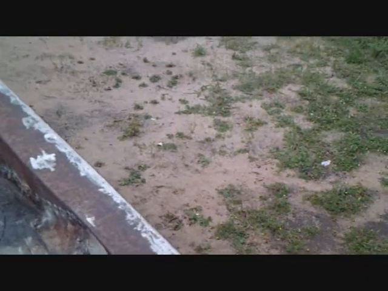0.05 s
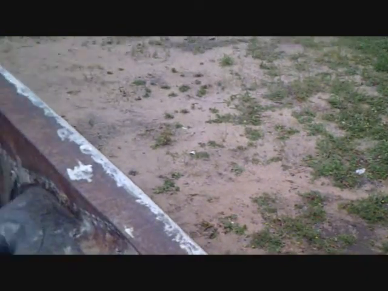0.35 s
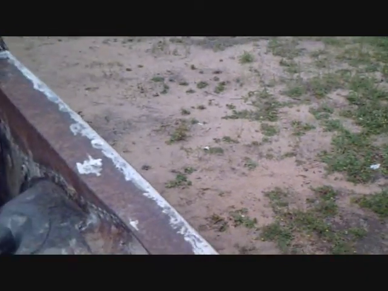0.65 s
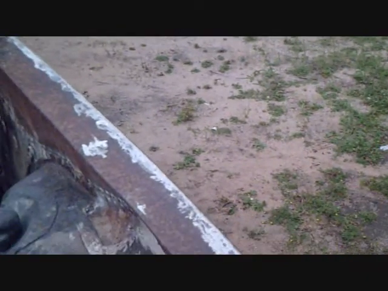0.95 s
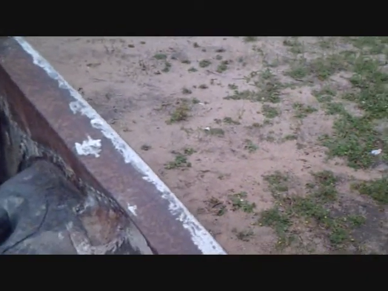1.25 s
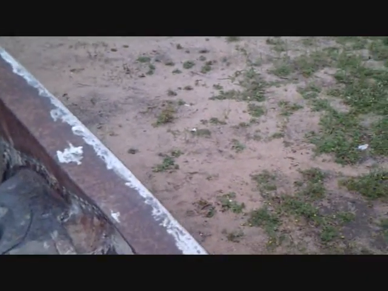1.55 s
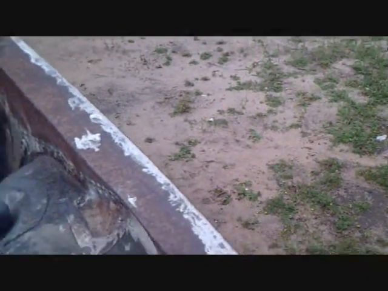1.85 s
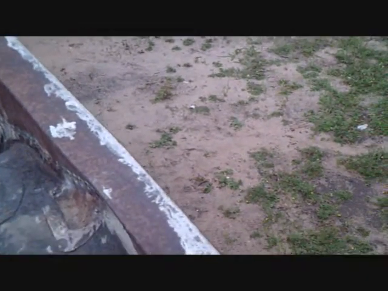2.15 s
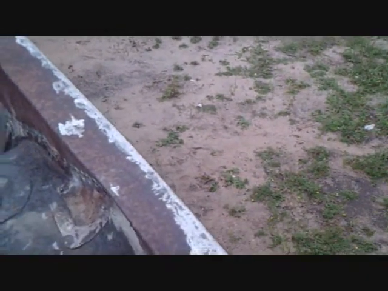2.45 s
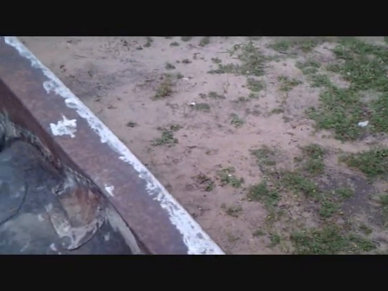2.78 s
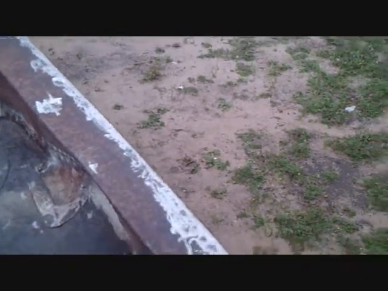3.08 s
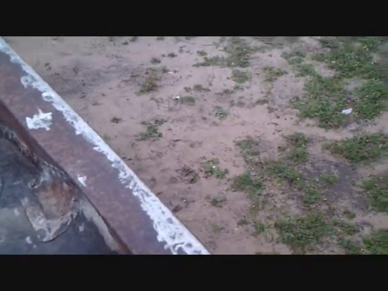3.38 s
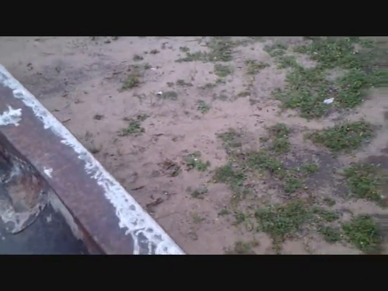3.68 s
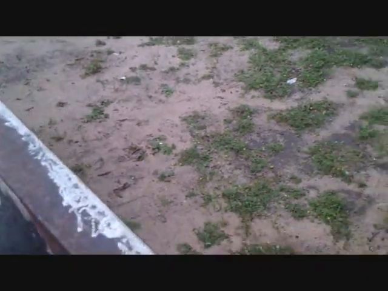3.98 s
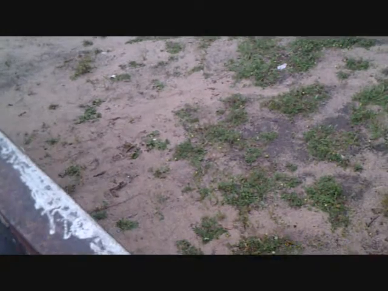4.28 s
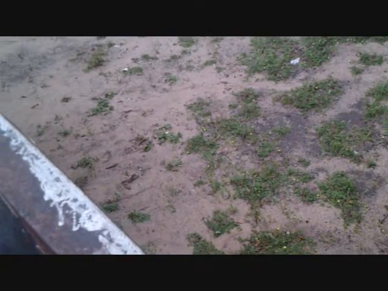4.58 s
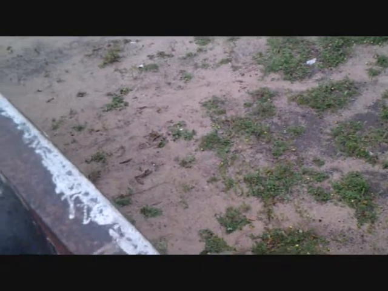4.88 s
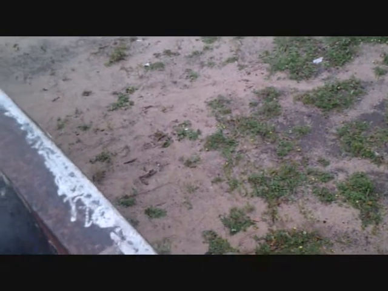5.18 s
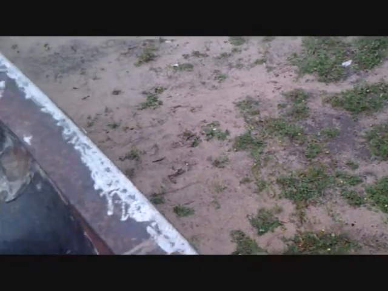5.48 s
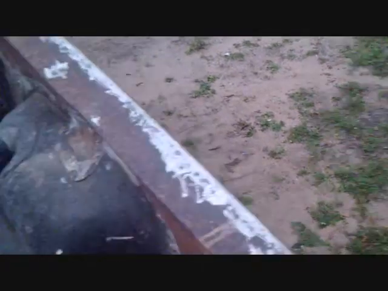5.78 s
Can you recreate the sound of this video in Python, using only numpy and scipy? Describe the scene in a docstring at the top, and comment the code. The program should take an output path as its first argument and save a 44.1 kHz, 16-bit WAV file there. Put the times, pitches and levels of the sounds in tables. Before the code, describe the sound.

A loose steel tailgate is moved about on a truck bed outdoors, close to the microphone, over soft air rumble, hiss and a faint high electronic whine. From the start, light, irregular knocks and gritty scrapes mix low thuds with short metallic ringing, growing firmer around 1.4 seconds. At about 1.7 seconds comes the loudest event, a harsh slam that overloads into a crunch; the whole sound dips, then slowly creeps back up. Strong clunks follow around 2.6 and 2.8 seconds and again at 3.1, trailing into lighter knocks until about 3.9. From 4 seconds the gate drags with a quieter, juddering scrape, and an edge gives a faint, brief squeal near 4.8. After a knock at 5 seconds, the gate drops into place with a solid clunk at about 5.3, followed by a few small settling taps until 5.6.

```python
"""A loose steel tailgate is moved about on a truck bed, outdoors, close to a small camera.
Over soft air noise and a faint whine, the gate scrapes and knocks; each clunk is a burst of tiny
bounces that rings the gate and the bed. At about 1.7 s a slam overloads the camera, which turns itself
down, whine and all, then creeps back up. More shoves and knocks follow, an edge squeals near 4.8 s,
and the gate drops into place at about 5.3 s."""
import sys
import numpy as np
from scipy import signal
from scipy.fft import rfft, irfft, next_fast_len
from scipy.io import wavfile

SR = 44100
rng = np.random.default_rng(int(sys.argv[2]) if len(sys.argv) > 2 else 0)


def int16_out(signal):
    """Quantize to a 16-bit WAV file."""
    q = np.round(np.clip(np.atleast_2d(signal).T, -1, 1) * 32767)
    wavfile.write(sys.argv[1], SR, q.astype(np.int16))


N = 257103
TIME = np.arange(N) / SR
THUD_TOP_HZ, TICK_BOTTOM_HZ = 350, 2300  # the clank lies between these two

# blows of the gate, plus one faint electrical click near 4.37 s;
# the slam is five quick bursts, a harsh overloaded crunch:
# t/s, contact time/s, thud level/dB, clank level/dB, tick level/dB
BLOWS = [(0.172, 0.0058, -40.5, -42, -58), (0.241, 0.039, -26, -29.5, -76),
         (0.2988, 0.017, -21, -25.5, -34), (0.33, 0.002, -24, -56, -30.5), (0.387, 0.0024, -29, -47, -49),
         (0.444, 0.0047, -37, -43, -57), (0.534, 0.013, -35, -43, -72), (0.752, 0.03, -29.5, -30.5, -40),
         (1.011, 0.014, -32, -38, -45.5), (1.029, 0.016, -26, -32, -44), (1.3603, 0.008, -15, -29, -83),
         (1.379, 0.012, -21, -38.5, -74.5), (1.436, 0.015, -32.5, -38, -90),
         (1.521, 0.032, -17.5, -21.5, -44), (1.597, 0.024, -45, -62, -46.5),
         (1.671, 0.0046, -17, -16, -41.5), (1.6785, 0.002, -12, -11, -20), (1.6862, 0.002, -6.5, -2.5, -14),
         (1.6915, 0.003, -1.5, 2.5, -11.5), (1.7004, 0.004, -2, -5.5, -5), (2.475, 0.014, -50, -45, -49.5),
         (2.579, 0.03, -13.5, -11.5, -41.5), (2.615, 0.025, -15.5, -13.5, -36.5),
         (2.783, 0.023, -13.5, -20, -42.5), (2.961, 0.01, -29.5, -42.5, -45),
         (3.1096, 0.015, -10, -8, -38.5), (3.132, 0.016, -13.5, -15.5, -41),
         (3.182, 0.02, -20.5, -22.5, -54), (3.23, 0.0023, -21, -28.5, -54), (3.363, 0.013, -23, -27, -89),
         (3.624, 0.013, -29.5, -30.5, -84), (3.697, 0.014, -27.5, -34.5, -57.5),
         (3.91, 0.016, -27, -33.5, -90), (4.374, 0.002, -54.5, -50, -54), (4.763, 0.016, -37, -43, -67),
         (4.957, 0.014, -31.5, -37, -52), (4.992, 0.035, -24.5, -25.5, -67),
         (5.3013, 0.0082, -13, -15.5, -38.5), (5.376, 0.012, -25.5, -30.5, -46),
         (5.454, 0.0067, -30.5, -43.5, -49), (5.494, 0.012, -54, -57, -48),
         (5.559, 0.018, -30.5, -29.5, -76), (5.619, 0.002, -38, -42, -59)]
# the tones at which the gate and the bed ring: f/Hz, level/dB
STEEL_TONES = [(84, -5.5), (110, -5), (154, 4.5), (225, 2), (255, -6), (310, -10), (375, -8), (495, -10),
               (552, -8), (608, -12), (684, 6), (752, -7.5), (791, -9), (850, -1), (899, 1), (1034, -12),
               (1118, -12), (1190, -14), (1276, -12.5), (1342, -5.5), (1425, -13), (1480, -15.5),
               (1580, -14.5), (1747, -15), (1850, -12.5)]


def from_db(db):
    """Turns decibels into a factor to multiply by."""
    return 10 ** (np.asarray(db) / 20)


def unit(x):
    """Scales a sound to an average strength (rms) of 1."""
    return x / np.sqrt(np.mean(x ** 2) + 1e-20)


def fade(t, t60):
    """Dies away by 60 dB every t60 seconds."""
    return np.exp(-np.log(1000) * t / t60)


def lookup(points, hz):
    """Reads between the rows of a table, with octaves evenly spaced."""
    f, value = np.transpose(points)
    return np.interp(np.log(hz + 1), np.log(f), value)


def coloured(x, points):
    """Gives a steady sound the bass and treble balance of a table."""
    size = next_fast_len(len(x))
    gains = from_db(lookup(points, np.fft.rfftfreq(size, 1 / SR)))
    return unit(irfft(rfft(x, size) * gains, size)[:len(x)])


def band(x, hz, kind, order=4):
    """Keeps the lows, the highs or a band; a higher order cuts more sharply."""
    return signal.sosfilt(signal.butter(order, hz, kind, fs=SR, output="sos"), x)


def lowpass(x, hz):
    """Cuts steeply above hz."""
    return signal.oaconvolve(x, signal.firwin(201, hz, window=("kaiser", 8), fs=SR), "same")


def wander(per_s):
    """Drifts to a new random value per_s times a second."""
    targets = rng.standard_normal(4000)
    return unit(np.interp(TIME * per_s, np.arange(len(targets)), targets))


def trailing_mean(x, seconds):
    """Averages over the moments just past."""
    size = max(int(seconds * SR), 1)
    return signal.oaconvolve(x, np.ones(size) / size)[:len(x)]


def add(mix, s, sound):
    """Mixes a sound in at s seconds."""
    part = mix[round(s * SR):][:len(sound)]
    part += sound[:len(part)]


def stroke(start, length, attack_s=0.033, t60=0.48):
    """Loudness of one movement: it takes hold quickly, holds, then coasts to a stop."""
    t = TIME - start
    return np.clip(t / attack_s, 0, 1) * fade(np.clip(t - length, 0, 2 * t60), t60)


def air(db=-39):
    """Air and handling at the microphone make a lumpy rumble under a smooth hiss."""
    # tone colour of still air and microphone hiss: f/Hz, level/dB
    air_colour = [(20, 2.5), (60, 1), (140, -6), (300, -15.5), (800, -20), (1600, -30), (2500, -35),
                  (3300, -36.5), (5000, -39), (10000, -41.5)]
    noise = coloured(rng.standard_normal(N), air_colour)
    lumps = band(noise, THUD_TOP_HZ, "low", order=1) * from_db(1.5 * wander(per_s=8))
    hiss = band(noise, THUD_TOP_HZ, "high", order=1)
    return from_db(db) * (lumps + hiss)


def camera_noise(offset=-.028, rumble_db=-48, beep_db=-70, beep_hz=6158, beeps_per_s=12.42):
    """The camera's circuits add a steady offset, a low rumble and a faint pulsing tone."""
    # tone colour of the electrical rumble: f/Hz, level/dB
    rumble_colour = [(15, 2), (45, 0), (90, -5), (150, -6), (200, -12), (280, -23), (600, -33), (2000, -42),
                     (10000, -42)]
    beep_on = (TIME - 1.82) * beeps_per_s % 1 < .62  # on for 62% of each cycle
    beep = from_db(beep_db) * trailing_mean(beep_on * 1., .003) * np.sin(2 * np.pi * beep_hz * TIME)
    return offset + beep + from_db(rumble_db) * coloured(rng.standard_normal(N), rumble_colour)


def whine(db=-59, hz=9310.5, slips_per_s=80.7):
    """A thin tone from the camera's electronics keeps slipping half a cycle, which splits it in two."""
    tone = np.sin(2 * np.pi * (hz * TIME + np.floor(slips_per_s * TIME) / 2))
    return from_db(db) * unit(band(tone, [hz - 2 * slips_per_s, hz + 2 * slips_per_s], "band", order=2))


def sliding():
    """How strongly the sliding gate grinds and hisses over time; overlapping slides add in power."""
    # short shoves and long, light drags: t/s, length/s, grind level/dB, hiss level/dB
    slides = [(0, 0.026, -43, -48.5), (0.167, 0.13, -41, -44.5), (0.459, 0.11, -48, -49.5),
              (0.527, 0.031, -43.5, -46.5), (0.776, 0.076, -40, -52), (0.841, 0.092, -41.5, -49),
              (0.973, 0.87, -50, -58.5), (1.198, 0.055, -39, -66), (1.697, 0.076, -23, -37.5),
              (2.197, 0.35, -54, -71.5), (2.54, 0.26, -36, -49), (2.849, 0.58, -48.5, -58.5),
              (3.722, 0.3, -49.5, -60.5), (3.98, 1.72, -51.5, -65.5), (4.028, 0.13, -37, -43),
              (4.22, 0.073, -43.5, -48), (4.476, 0.052, -43, -52), (4.567, 0.026, -40.5, -54.5),
              (4.645, 0.03, -43, -55), (4.84, 0.13, -46, -53.5), (5.192, 0.22, -46.5, -54.5),
              (5.38, 0.18, -45, -59)]
    grind_power, hiss_power = np.zeros((2, N))
    for start, length, grind_db, hiss_db in slides:
        movement = stroke(start, length)
        grind_power += (from_db(grind_db) * movement) ** 2
        hiss_power += (from_db(hiss_db) * movement) ** 2
    return np.sqrt(grind_power), np.sqrt(hiss_power)


def rocking(grind_strength, shudder_db=8, shudder_hz=24, sway_db=-10, sway_hz=55):
    """The bed shudders as the gate drags over it and sways after each thud, more after a heavy one."""
    shudder = unit(band(rng.standard_normal(N), shudder_hz, "low", order=2))
    sway = unit(band(rng.standard_normal(N), sway_hz, "low", order=3))
    jolts = sum(from_db(thud_db) * stroke(s, contact_s, attack_s=0.015, t60=0.5)
                for s, contact_s, thud_db, _, _ in BLOWS)
    return from_db(shudder_db) * shudder * grind_strength + from_db(sway_db) * sway * jolts


def squeal(db=-54, hz=4200, width_hz=450):
    """Rubbing makes one sliding edge sing briefly at a high pitch."""
    ring = signal.lfilter(*signal.iirpeak(hz, hz / width_hz, fs=SR), rng.standard_normal(N))
    return from_db(db) * unit(ring) * stroke(start=4.83, length=0.091)


def scraping(grind_strength, hiss_strength, grind_db=3, grit_per_s=700, grit_db=-2, ring_share=0.25):
    """Rust and grit catch and slip under the gate: a juddering rub that also sets the steel ringing."""
    # tone colour of the scrape, with the camera case's peak near 3.3 kHz: f/Hz, level/dB
    scrape_colour = [(100, 4.5), (300, 8), (520, -1.5), (800, -1.5), (1400, -3.5), (1900, -9),
                     (2450, -22.5), (2850, -15.5), (3300, -7.5), (3900, -17.5), (6000, -15), (8800, -10),
                     (10500, -20.5)]
    catches = rng.random(N) < grit_per_s / SR
    sizes = from_db(4 * np.minimum(rng.exponential(1, N), 4))
    grit = unit(catches * sizes * rng.choice([-1, 1], N))
    friction = rng.standard_normal(N) + from_db(grit_db) * grit
    scrape = coloured(friction, scrape_colour) * from_db(1.3 * wander(per_s=70))  # the judder
    rub = unit(band(scrape, [110, TICK_BOTTOM_HZ], "band"))
    ring = unit(sum(signal.lfilter(*signal.iirpeak(hz, Q=80, fs=SR), rub) for hz, _ in STEEL_TONES))
    grind = from_db(grind_db) * unit((1 - ring_share) * rub + ring_share * ring)
    hiss = unit(band(scrape, TICK_BOTTOM_HZ, "high"))
    return grind * grind_strength + hiss * hiss_strength


def panel_crash(wash_db=-11, wash_t60=0.26):
    """Struck panels give a short, noisy crash, with a duller wash of sound from the bed."""
    # tone colour of the crash, with the camera case's peak near 3.3 kHz: f/Hz, level/dB
    crash_colour = [(60, -6.5), (150, -3), (300, -6), (480, 2), (850, 1.5), (1300, -6.5), (1850, -12.5),
                    (2450, -33.5), (2900, -17), (3300, -9.5), (3900, -19.5), (6000, -13.5), (9000, -18.5),
                    (11000, -21)]
    # how long the crash takes to fade by 60 dB: f/Hz, t60/s
    crash_fades = [(80, 0.31), (300, 0.2), (1000, 0.045), (2000, 0.13), (3300, 0.042), (6000, 0.013),
                   (10000, 0.038)]
    t = np.arange(SR * 3 // 4) / SR
    spectrum = rfft(coloured(rng.standard_normal(len(t)), crash_colour))
    hz = np.fft.rfftfreq(len(t), 1 / SR)
    centres, fade_times = np.transpose(crash_fades)
    crash = np.zeros(len(t))
    for share, t60 in zip(np.eye(len(centres)), fade_times):  # one band of pitches at a time
        this_band = lookup(list(zip(centres, share)), hz)
        crash += irfft(spectrum * this_band, len(t)) * fade(t, t60)
    wash = band(irfft(spectrum, len(t)), TICK_BOTTOM_HZ, "low") * fade(t, wash_t60)
    return unit(crash + from_db(wash_db) * wash)


def steel_hit(ring_db=-9, ring_t60=0.48, detune=.012, spread_db=5):
    """One contact: the crash plus ringing tones, which vary by chance as the gate rests differently."""
    crash = panel_crash()
    t = np.arange(len(crash)) / SR
    hz, db = np.transpose(STEEL_TONES)[:, :, None]
    hz = hz * (1 + detune * rng.standard_normal(hz.shape))
    t60 = ring_t60 * (hz / THUD_TOP_HZ) ** (-1 / 4)  # higher tones die sooner
    sizes = from_db(db + spread_db * rng.standard_normal(hz.shape)) * rng.choice([-1, 1], hz.shape)
    tones = sizes * np.sin(2 * np.pi * hz * t) * fade(t, t60)
    return crash + from_db(ring_db) * unit(tones.sum(0))


def chatter(contact_s, bounces_per_s=480, spread_db=3, first_blow=2.67, fade_db=-4):
    """The force of a clunk: one blow, then uneven, weakening bounces while the contact lasts."""
    t = np.arange(SR // 16) / SR
    sizes = from_db(spread_db * rng.standard_normal(len(t)) + fade_db * np.minimum(t / contact_s, 1))
    bounces = (rng.random(len(t)) < bounces_per_s / SR) & (t < contact_s)
    force = bounces * sizes * rng.choice([-1, 1], len(t))
    force[0] = first_blow
    return force


def clunks(bed_hz=65, bright_hz=1100, usual_tick_db=-28, tick_t60=0.39):
    """Each clunk has its own mix of low thud (the bed), clank (the gate) and high tick (the edges)."""
    out = np.zeros(N)
    for s, contact_s, thud_db, clank_db, tick_db in BLOWS:
        blow = signal.fftconvolve(steel_hit(), chatter(contact_s))
        thud = band(blow, [bed_hz, THUD_TOP_HZ], "band", order=3)
        clank = band(blow, [THUD_TOP_HZ, TICK_BOTTOM_HZ], "band", order=3)
        # a hard, edge-on contact ticks more and also brightens the clank
        hardness = from_db(.3 * (tick_db - clank_db - usual_tick_db))
        bright = hardness * band(clank, bright_hz, "high", order=3)
        clank = band(clank, bright_hz, "low", order=3) + bright
        # once the edges rest on each other, they muffle the treble
        resting_s = np.maximum(np.arange(len(blow)) / SR - contact_s, 0)
        tick = band(blow, TICK_BOTTOM_HZ, "high", order=6) * fade(resting_s, tick_t60)
        for part, db in (thud, thud_db), (clank, clank_db), (tick, tick_db):
            add(out, s, from_db(db) * part / np.std(part[:SR // 25]))  # the first 40 ms set the level
    return out


def scene():
    """Everything that reaches the microphone's amplifier, in one channel."""
    grind, hiss = sliding()
    return (clunks() + scraping(grind, hiss) + squeal() + rocking(grind) + air() + whine())[None]


def gain_control(x, threshold_db=-18, slope=0.79, recover_db_per_s=6.0, start_cut_db=8):
    """The camera turns itself down quickly after a loud blow, then slowly back up."""
    power = trailing_mean(band(x, THUD_TOP_HZ, "high", order=1) ** 2, seconds=0.02)
    wanted_cut_db = slope * (10 * np.log10(abs(power) + 1e-12) - threshold_db)
    recovery_db = recover_db_per_s * TIME
    # hold the deepest cut so far, letting it shrink steadily to zero
    deepest_db = np.maximum.accumulate(np.maximum(wanted_cut_db + recovery_db, start_cut_db))
    cut_db = np.maximum(deepest_db - recovery_db, 0)
    return x * from_db(-start_cut_db - trailing_mean(cut_db - start_cut_db, seconds=0.015))


def record(dry):
    """The camera sets its volume, adds its own noise, then twice flattens peaks and trims the treble."""
    x = gain_control(dry[0]) + camera_noise()
    x = lowpass(np.clip(x, -1.3, 1.3), hz=10600)  # the microphone stage overloads
    return lowpass(np.clip(x, -1, 1), hz=16800)[None]


dry = scene()
out = record(dry)
int16_out(out)
```